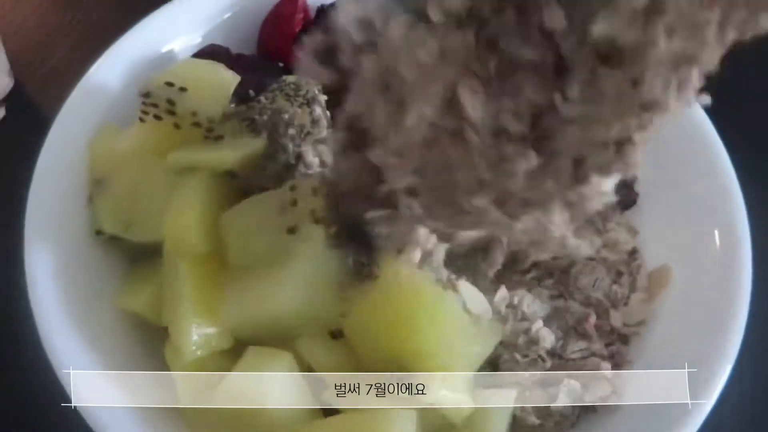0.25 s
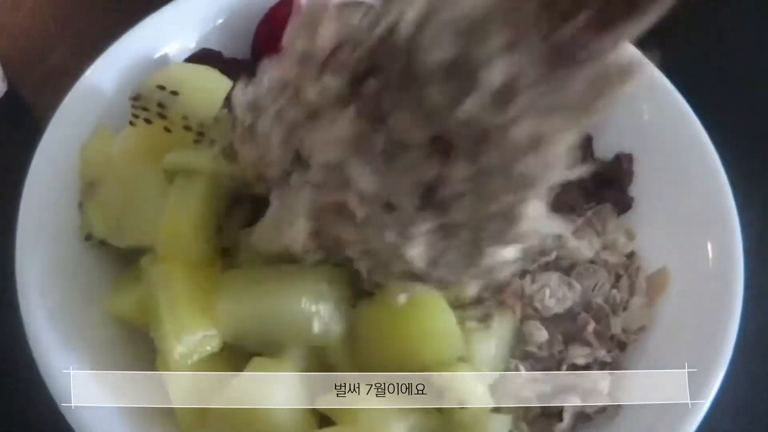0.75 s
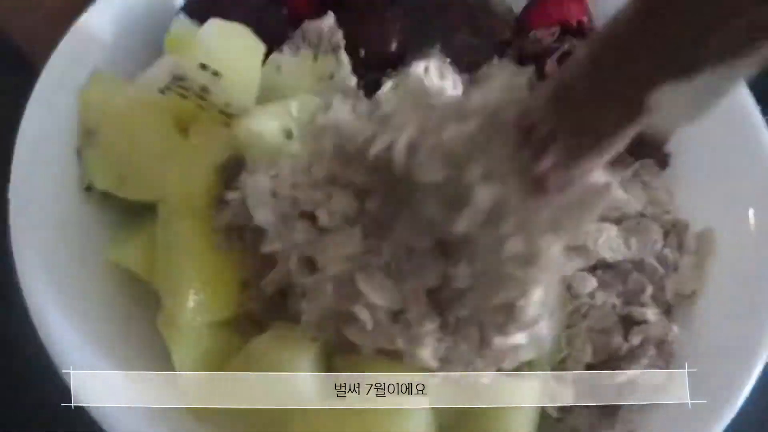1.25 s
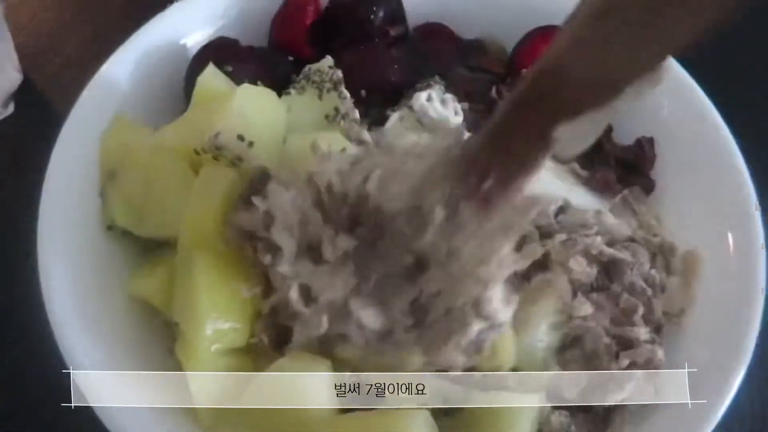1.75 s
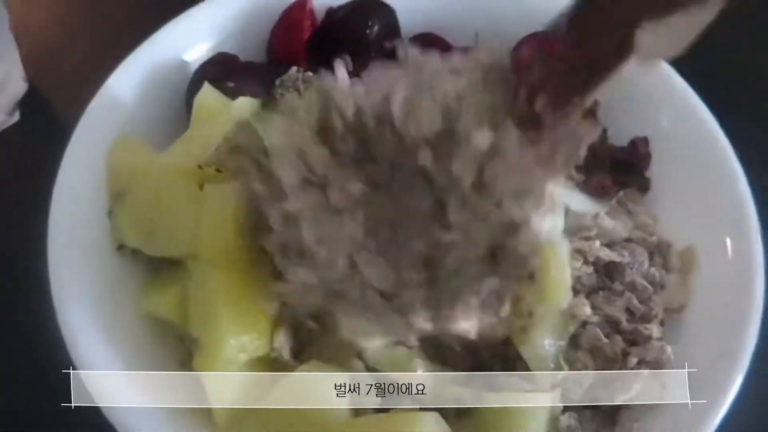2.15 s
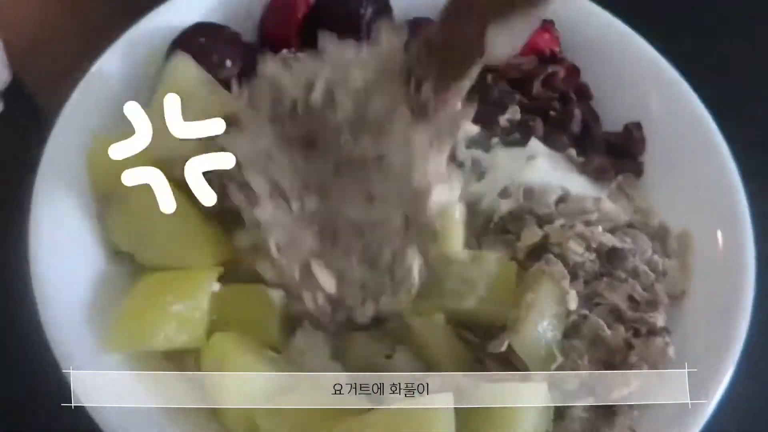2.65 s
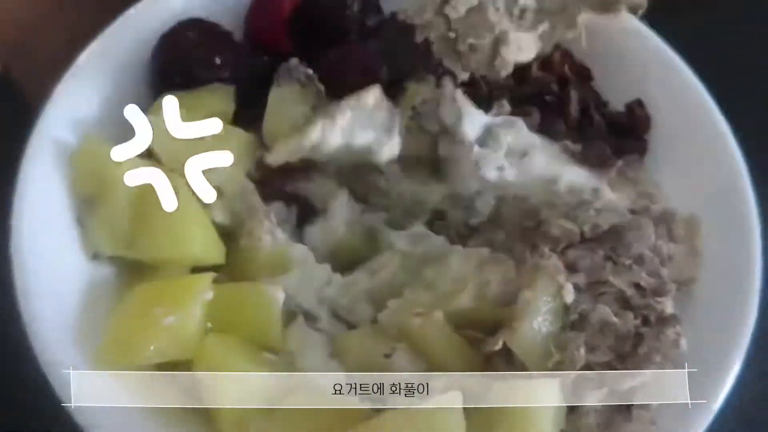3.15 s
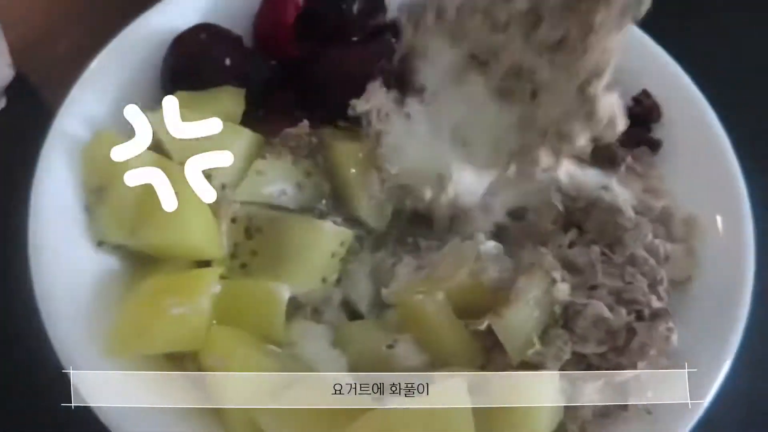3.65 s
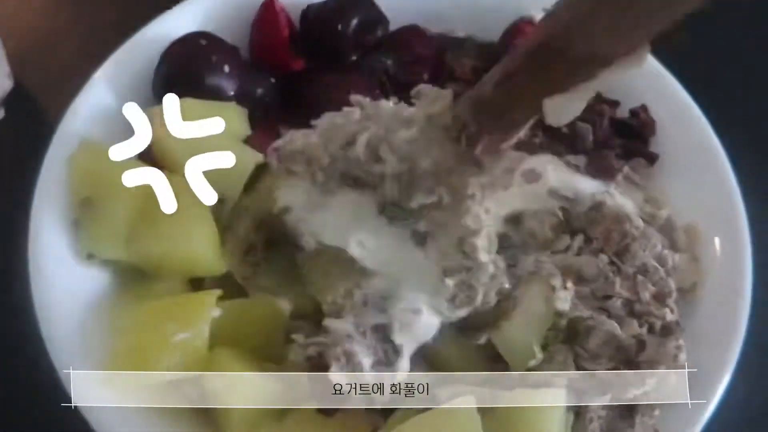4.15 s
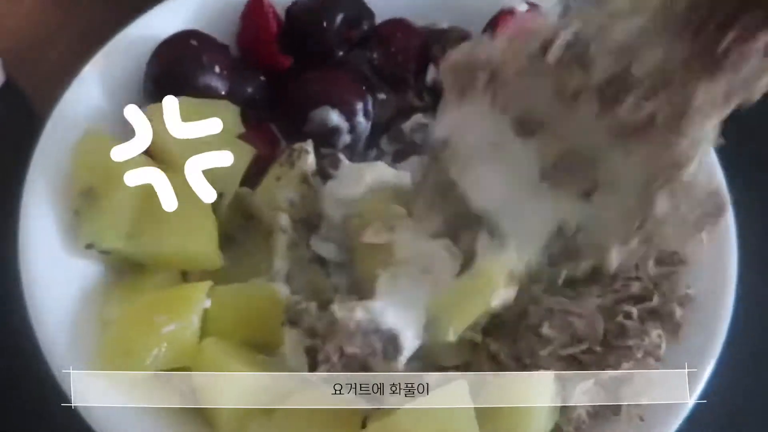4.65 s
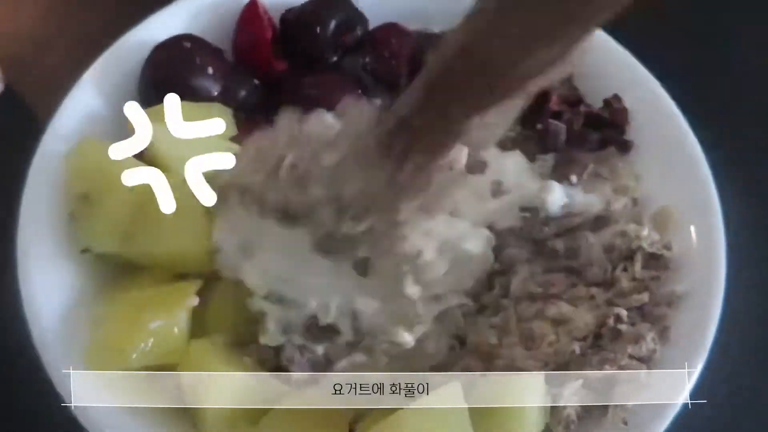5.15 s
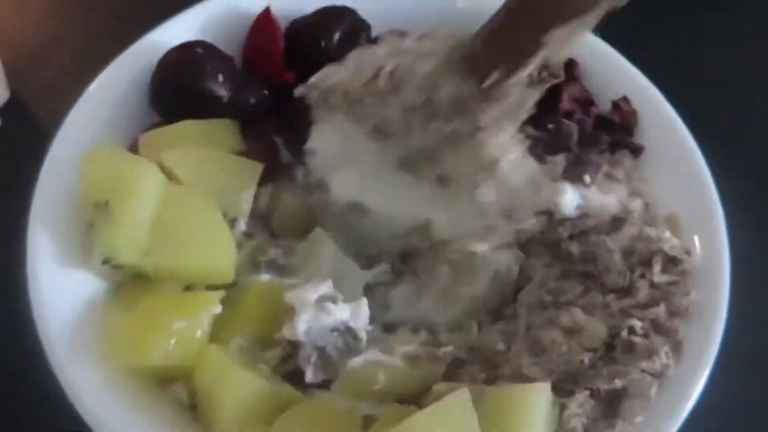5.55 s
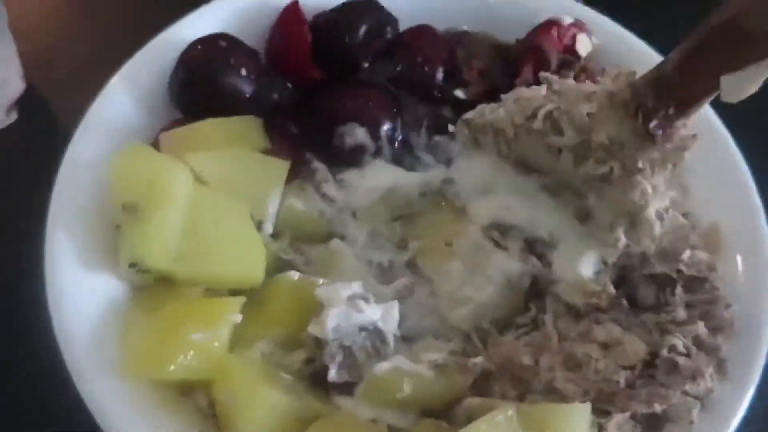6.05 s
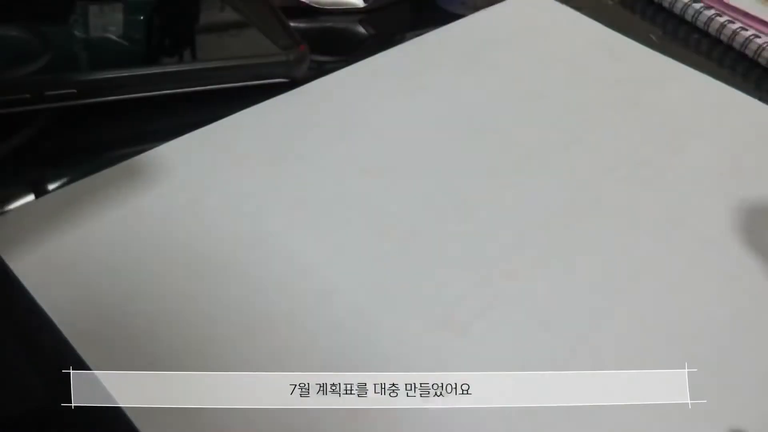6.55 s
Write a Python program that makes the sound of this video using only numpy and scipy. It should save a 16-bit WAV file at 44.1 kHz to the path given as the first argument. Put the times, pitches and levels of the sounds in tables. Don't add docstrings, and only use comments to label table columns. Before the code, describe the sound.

Gritty wood scraping with hard knocks cuts to rapid crunching chops and sharp ceramic ticks over fridge hum, then a quiet desk with faint ticks.

```python
import sys
import numpy as np
from scipy import signal
from scipy.fft import rfft, irfft, next_fast_len
from scipy.io import wavfile
from scipy.ndimage import uniform_filter1d

SR = 44100
rng = np.random.default_rng(int(sys.argv[2]) if len(sys.argv) > 2 else 0)


def transcribe(signal):
    frames = np.atleast_2d(signal).T
    limited = np.clip(frames, -1, 1)
    pcm = np.round(limited * 32767).astype(np.int16)
    wavfile.write(sys.argv[1], SR, pcm)


def nominal_scale(level):
    x = np.asarray(level, float) / 20
    return 10 ** x


N = 300313
T = np.arange(N) / SR

# start in seconds, end in seconds, edge in ms.
SHOTS = [
    (-1, 2.437, 4),
    (2.437, 6.284, 3),
    (6.317, 8, 1),
]
# frequency in Hz, level in dB per Hz.
AIR = [
    [(15, -32.5), (25, -12.5), (59, -2), (145, -3.5), (270, 1), (591, -18), (659, -12), (775, -14),
     (1610, -14.5), (6920, -30), (13600, -39.5), (16000, -46.5)],
    [(20, -49.5), (45, -43), (70, -21.5), (115, -27), (170, -15.5), (300, -18.5), (450, -12.5), (570, -12),
     (640, -7.5), (720, -12), (1200, -16), (1700, -23), (4000, -25), (15000, -36), (16300, -40)],
    [(15, -54), (25, -23), (48, -33), (195, -7.5), (394, -4.5), (591, -5), (1560, -18.5), (2550, -17.5),
     (8360, -25.5), (14800, -36.5), (16000, -47.5)],
]
# frequency in Hz, level in dB, t60 in seconds.
BOWL = [(1057, 15, 0.023), (830, 5, 0.041), (1322, 2, 0.047), (576, 0, 0.056), (425, -1.5, 0.044)]
# frequency in Hz, level in dB, t60 in seconds.
TABLE = [(225, 3.5, 0.04), (278.3, 5.5, 0.052)]


def unit(x):
    return x / np.sqrt(np.mean(x ** 2))


def colour(x, points):
    hz, db = np.transpose(points)
    n = next_fast_len(len(x))
    f = np.maximum(np.fft.rfftfreq(n, 1 / SR), 1)
    gain = nominal_scale(np.interp(np.log(f), np.log(hz), db, left=-80, right=-80))
    return unit(irfft(rfft(x, n) * gain, n)[:len(x)])


def band(x, lo_hz, hi_hz):
    edges_hz = [lo_hz, min(hi_hz, 0.45 * SR)]
    return signal.sosfilt(signal.butter(2, edges_hz, "bandpass", fs=SR, output="sos"), x)


def walk(rate):
    k = int(SR / rate)
    steps = np.repeat(rng.standard_normal(N // k + 1), k)
    return unit(uniform_filter1d(uniform_filter1d(steps, k), k)[:N])


def grains(per_s, spread_db):
    hits = (rng.random(N) < per_s / SR) * rng.standard_normal(N)
    return hits * nominal_scale(spread_db * np.minimum(rng.exponential(size=N), 3))


def ring(modes, detune=1, push_ms=0.71, size=SR // 3):
    t = T[:size]
    y = sum(nominal_scale(db) * np.sin(2 * np.pi * hz * detune * t) * 1000. ** (-t / t60) for hz, db, t60 in modes)
    y = y * np.sin(np.pi / 2 * np.minimum(t * 1000 / push_ms, 1)) ** 2
    return y / np.abs(y).max()


def ground(modes, shorter, per_s, spread_db):
    pressed = ring([(hz, db, shorter * t60) for hz, db, t60 in modes])
    return unit(signal.fftconvolve(grains(per_s, spread_db), pressed)[:N])


def add(track, s, sound):
    i = int(s * SR)
    track[i:i + len(sound)] += sound[:N - i]


def swells(rows, square=1.7):
    out = np.zeros(N)
    for s, db, rise_ms, fall_ms in rows:
        near = slice(max(int((s - rise_ms / 250) * SR), 0), int((s + fall_ms / 125) * SR))
        t = T[near] - s
        late = np.abs(t) * 1000 / np.where(t < 0, rise_ms, fall_ms)
        out[near] += nominal_scale(db - 12.25 * late ** np.where(t < 0, square, 1.15))
    return out


def patchy(x, lo_hz, spread_db, rate):
    edges = lo_hz * 2 ** np.arange(0, np.log2(16000 / lo_hz), 0.5)
    return unit(sum(nominal_scale(spread_db * walk(rate)) * band(x, hz, 1.375 * hz) for hz in edges))


def shot(k):
    start, end, edge_ms = SHOTS[k]
    return np.clip(np.minimum(T - start, end - T) * 1000 / edge_ms + 0.5, 0, 1)


def crunch():
    # time in seconds, rms level in dB, length in ms, depth in dB.
    chop_rows = [(2.519, -46, 34, -1), (2.629, -48.5, 30, 0), (2.755, -43, 26, -5), (2.881, -47, 56, -1.5),
                 (3.008, -44.5, 34, -16), (3.2, -51, 28, 6), (3.294, -45.5, 26, -3), (3.442, -40, 47, -6),
                 (3.569, -44, 41, -7), (3.668, -42.5, 36, -2.5), (3.781, -50.5, 41, 2),
                 (3.89, -42, 19, -17), (4.001, -48, 20, -6), (4.095, -46.5, 27, 4), (4.205, -49.5, 43, 1.5),
                 (4.313, -40.5, 43, 0), (4.422, -39.5, 26, -7), (4.539, -41, 32, -2.5),
                 (4.645, -44, 29, -10), (4.771, -43, 30, 0.5), (4.884, -39.5, 25, -6),
                 (5.007, -42.5, 25, -4), (5.121, -44, 18, -3), (5.256, -47, 33, -10),
                 (5.486, -48.5, 33, 1.5), (5.59, -45, 28, 3.5), (5.609, -53.5, 38, 1), (5.692, -49, 19, 1),
                 (5.757, -48.5, 67, 6.5), (5.871, -48, 38, 6.5), (5.977, -41, 31, -4.5)]
    # time in seconds, rms level in dB, fall in ms.
    burst_rows = [(2.892, -33.5, 12), (3.331, -43, 7.6), (3.352, -41, 9.2), (3.452, -26.5, 7.5),
                  (3.899, -30.5, 12), (4.43, -32.5, 11), (4.656, -29.5, 11)]
    # frequency in Hz, level in dB per Hz.
    crunch_colour = [(1300, -31), (2100, -5), (2800, -5), (3400, -2), (4600, -1), (5600, -2.5),
                     (6900, -4.5), (8200, -7.5), (11000, -14)]
    rise = 0.46
    suddenness = 3.4
    shapes = [(s, db, rise * ms, (1 - rise) * ms, depth_db) for s, db, ms, depth_db in chop_rows]
    chops = swells([(s, db, up, down) for s, db, up, down, _ in shapes], suddenness)
    digs = swells([(s, db + depth_db, up, down) for s, db, up, down, depth_db in shapes], suddenness)
    bursts = swells([(s, db, 4.6, ms) for s, db, ms in burst_rows])

    body = chops + bursts
    top = nominal_scale(-7) * chops + nominal_scale(-9.5) * bursts
    deep = digs + nominal_scale(-3) * bursts
    flakes = colour(grains(per_s=4500, spread_db=2.6), crunch_colour)
    flakes = patchy(flakes, 1417, 2.1, 60)
    crumbs = unit(band(grains(per_s=9000, spread_db=2.2), 9500, 16300))
    grind = ground(BOWL + TABLE, 0.5, per_s=2000, spread_db=3.0)
    return nominal_scale(2 * walk(200)) * body * flakes + nominal_scale(2 * walk(200)) * top * crumbs + deep * grind


def thuds():
    # time in seconds, peak in dB, weight on the table in dB,
    # extra hollow ring in dB.
    thud_rows = [(2.523, -34, -12, 0), (2.767, -35.5, -2.5, -1), (2.858, -44, 10, 0),
                 (2.8933, -18, -19, -3.5), (2.995, -36, 1, 3), (3.013, -39, -25, 0), (3.194, -40, 2, 2),
                 (3.349, -32, -7, 6), (3.434, -34.5, -19, 0), (3.4516, -23, -11, 6), (3.457, -24.5, -18, 4),
                 (3.569, -41, 2, 2), (3.779, -46, 6.5, 2), (3.884, -45.5, 12.5, 0),
                 (3.897, -15, -17.5, -1.5), (4.004, -29.5, -1, 8), (4.092, -46, 0, 3), (4.205, -43, 3, 3),
                 (4.292, -35, -22, 7), (4.312, -32.5, -13, 0), (4.407, -35.5, -18, -4),
                 (4.43, -22.5, -19.5, 1), (4.525, -40, -20, 4), (4.542, -23, -22, -4), (4.64, -35, -14, 2),
                 (4.654, -24.5, -18, -1), (4.7651, -28.5, -9, 2), (4.771, -25.5, -8.5, 5),
                 (4.782, -33.5, -12, 0), (4.878, -36.5, -1, 2), (4.999, -37, -7, -3), (5.128, -36, -8, 10),
                 (5.134, -36.5, -18, 6), (5.256, -29, -12, 7), (5.263, -31.5, -10, 5), (5.487, -44, -10, 0),
                 (5.577, -34, -6, 4), (5.599, -44, -8, 7), (5.744, -38, 2.5, 7), (5.7626, -27.5, -3.5, -6),
                 (5.854, -44, -17, 3), (5.879, -41, -3, -3), (5.971, -33, -15, -3), (5.978, -34, -16, -6)]
    out = np.zeros(N)
    for (s, db, weight_db, hollow_db), luck in zip(thud_rows, rng.standard_normal((len(thud_rows), 11))):
        struck = []
        for k, (hz, mode_db, t60) in enumerate(BOWL):
            level_db = mode_db + 1.5 * luck[k] + hollow_db * (k == 1)
            struck.append((hz * (1 + luck[k + 5] / 70), level_db, t60))
        add(out, s, nominal_scale(db) * ring(struck, push_ms=0.97, size=SR // 10))
        table_blow = ring(TABLE, 1 + luck[10] / 40, push_ms=1.93, size=SR // 10)
        add(out, s, nominal_scale(db + weight_db) * table_blow)
    return out


def ticks():
    # time in seconds, peak in dB, pitch in Hz, edge in dB.
    strikes = [(2.732, -20, 5680, -28.5), (2.8931, -3.5, 4330, -32.5), (3.3284, -11, 6300, -5.5),
               (3.3513, -24, 3000, 2), (3.3551, -13, 4730, 0), (3.364, -36, 6000, 3),
               (3.4514, -15, 3910, -12), (3.8971, -1.5, 6800, -14.5), (3.8972, -4, 3400, -39),
               (4.2959, -31, 5300, -8), (4.3117, -24, 5330, -7), (4.408, -37, 3600, -17.5),
               (4.4297, -12.5, 3840, -36), (4.5237, -22, 6000, -14), (4.5294, -16.5, 7000, -24),
               (4.5431, -20.5, 3860, -15), (4.5785, -24, 4850, -23), (4.6551, -13, 7100, -21.5),
               (4.6826, -22, 6500, -7), (4.6858, -23, 4170, -28.5), (5.0093, -22, 8200, 18),
               (5.2635, -28, 6800, -11), (5.5773, -19, 6400, -0.5), (5.581, -26, 8400, 15),
               (5.6908, -16.5, 5800, -4), (5.7629, -21.5, 3280, -19), (5.8791, -26, 5240, 0),
               (5.9774, -17, 5800, 4)]
    # time in seconds, peak in dB, pitch in Hz.
    snaps = [(2.4407, -33, 9600), (2.5727, -24, 7350), (2.6162, -32, 9300), (2.7515, -25, 4700),
             (2.8565, -29, 10400), (2.942, -37, 4900), (3.1965, -27, 4460), (3.2026, -30, 5600),
             (3.265, -26, 5000), (3.3222, -32, 5000), (3.2903, -25, 7100), (3.3255, -28, 5900),
             (3.3331, -32, 6700), (3.4183, -35, 8500), (3.4551, -30, 5400), (3.4948, -35, 5900),
             (3.5738, -27, 6800), (3.6701, -30, 4770), (3.8804, -36, 8900), (4.0039, -33, 3840),
             (4.0857, -31, 4280), (4.3708, -25, 6800), (4.6362, -31, 6370), (4.7676, -29, 5700),
             (4.9385, -31.5, 4970), (5.001, -24.5, 5040), (5.0584, -33, 5600), (5.1141, -28, 3550),
             (5.1265, -32, 4700), (5.475, -27.5, 5860), (5.5862, -29, 3900)]
    # time in seconds, peak in dB, pitch in Hz.
    grit = [(0.1476, -38.5, 2400), (0.4718, -44, 3100), (0.6755, -37, 2700), (1.1685, -41, 3900),
            (1.627, -11.5, 1870), (1.6268, -21, 3200), (1.6269, -23, 5500), (1.8815, -43, 2800),
            (1.8923, -34, 2350), (2.1, -41.5, 2010), (2.198, -42, 1500), (2.3036, -33, 5500),
            (2.304, -22, 1250), (2.206, -34, 4500), (2.209, -37.5, 4500), (2.25, -29, 1700),
            (2.2506, -28, 4400), (2.2683, -28, 2690), (2.3, -37, 2300), (2.3033, -19.5, 2250),
            (2.42, -33.5, 4460), (6.5209, -52, 5660), (6.6994, -54, 5870), (6.7204, -50, 5430),
            (6.7431, -54, 5300), (6.7637, -52, 2180)]
    # time in seconds, peak in dB, pitch in Hz.
    more_snaps = [(2.7494, -37, 3700), (2.7534, -31, 4800), (2.8715, -33, 6500), (2.8803, -33, 5000),
                  (2.8898, -20, 3360), (2.8912, -21, 6970), (3.2918, -22, 6900), (3.296, -30, 7500),
                  (3.299, -30, 5950), (3.3269, -30, 10500), (3.4478, -30, 5600), (3.4531, -24, 3550),
                  (3.4569, -28, 3400), (3.486, -38, 5200), (3.5679, -33, 5400), (3.6644, -27, 4480),
                  (3.6717, -33, 4650), (3.8852, -35, 6000), (3.8888, -31, 5900), (3.9086, -32, 6800),
                  (4.3065, -36, 5400), (4.4311, -18.5, 3300), (4.5338, -31, 5250), (4.6523, -23, 3080),
                  (4.6535, -24, 4050), (4.6575, -23, 7300), (4.678, -29, 5900), (4.7664, -36, 7000),
                  (4.7722, -31, 3880), (4.8779, -33, 4560), (4.8852, -23, 7750), (4.8868, -34, 4700),
                  (5.067, -40, 11000), (5.1122, -38, 3600), (5.1235, -30, 4200), (5.2555, -26, 6800),
                  (5.5795, -27.5, 2570), (5.5896, -38, 5200), (5.689, -39, 5700), (5.7265, -35, 3280),
                  (5.746, -31, 9500), (5.9721, -29, 4300)]
    glaze_hz = [3400, 4700, 6800, 9300]
    # time in seconds, level in dB, then its ringing as rows of
    # frequency in Hz, level in dB, t60 in seconds.
    tap = (6.7625, -38, [(800, 10, 0.02), (1070, 8, 0.01), (1720, -7, 0.0077), (3200, -10, 0.0053)])
    rows = list(strikes)
    for s, db, hz in snaps + grit + more_snaps:
        rows.append((s, db, hz, min(-17 + 15 * np.log2(hz / 5000), 0)))

    mid, side = np.zeros((2, N))
    t = T[:400]
    for (s, db, hz, edge_db), noise in zip(rows, rng.standard_normal((len(rows), 400))):
        in_bowl = SHOTS[1][0] < s < SHOTS[1][1]
        rings_hz = glaze_hz if in_bowl else [0.91 * hz]
        modes = [(g, 1.5 * u - 7 - 14 * np.log2(g / hz) ** 2, 0.0026) for g, u in zip(rings_hz, noise)]
        modes.append((hz, 5, (4.6 if in_bowl else 9) / hz))
        modes.append((14500, edge_db + 6.0, 0.001))
        click = band(ring(modes, push_ms=700 / hz, size=400), 0.7 * hz, 17000)
        rustle = nominal_scale(-14.5) * unit(band(noise, 0.63 * hz, 1.76 * hz)) * np.exp(-t / 0.00067)
        add(mid, s, -nominal_scale(db + 2.5) * (click + rustle))
        add(side, s, nominal_scale(min(db, -16) - 11) * np.tanh(noise[-1]) * np.gradient(click))
    tap_s, tap_db, tap_modes = tap
    add(mid, tap_s, nominal_scale(tap_db) * band(ring(tap_modes, push_ms=0.25), 296, 12000))
    return mid, side


def board():
    # time in seconds, level in dB, rise in ms, fall in ms.
    stroke_rows = [(0.0, -51, 30, 110), (.17, -64, 160, 47), (.365, -41, 55, 76), (.51, -61, 31, 65),
                   (.8, -42, 68, 57), (1.225, -43, 56, 60), (1.6, -40.5, 48, 26), (1.94, -45.5, 41, 31),
                   (2.01, -66, 18, 30), (2.06, -66, 74, 58), (2.285, -46, 56, 48)]
    # frequency in Hz, level in dB per Hz.
    scrape_colour = [(350, -42), (600, -8.5), (894, -26), (970, -5.5), (1510, 3.5), (1660, 1.5),
                     (2310, 3.5), (3080, -3), (5630, -6), (16000, -31.5)]
    # time in seconds, body in dB, snap in dB, snap pitch in Hz, rattle in dB.
    knocks = [
        (1.6268, -12, -3.5, 1576, -35.5),
        (1.6405, -17.5, -14.5, 1480, -57.5),
        (1.9635, -20.5, -55, 800, -62),
        (1.9753, -22.5, -56, 800, -74.5),
        (2.3037, -11.5, -20, 2290, -46.5),
        (2.3155, -20.5, -44, 1450, -69),
    ]
    # frequency in Hz, level in dB, t60 in seconds.
    board_modes = [(278, -1, 0.1), (350, 13.5, 0.095), (385, -14, 0.087), (462, 4, 0.08), (686, -12, 0.04),
                   (964, -11, 0.04), (1150, -14, .04), (99.6, -6, 0.17)]
    scrape = patchy(colour(grains(per_s=5000, spread_db=2.2), scrape_colour), 500, 2.5, 25)
    rumble = ground(board_modes, 0.48, per_s=900, spread_db=3.5)
    rattle = unit(band(band(grains(per_s=6500, spread_db=-2.0), 745, 1920), 754, 2960))
    strokes = swells(stroke_rows)
    contact = nominal_scale(-66) + strokes
    shake = nominal_scale(-65.5) + nominal_scale(-4) * strokes

    out = np.zeros(N)
    for k, (s, body_db, snap_db, snap_hz, rattle_db) in enumerate(knocks):
        since_first = T[:SR // 3] + s - knocks[k - k % 2][0]
        settled = np.clip((since_first - 0.0185) / 0.0034, 0, 1)
        add(out, s + 0.00074, nominal_scale(body_db - 17 * settled) * ring(board_modes, push_ms=1.41))
        add(out, s, -nominal_scale(snap_db) * ring([(snap_hz, 0, 0.0075)], push_ms=0.98))
        add(shake, s, nominal_scale(body_db - 25 - 60 * T[:SR] / 0.54))
        out += (T > s) * nominal_scale(rattle_db - 60 * np.abs(T - s) / 0.5) * rattle
    unsteady_hand = nominal_scale(2.06 * walk(59.8))
    return out + unsteady_hand * (contact * scrape + shake * rumble)


def bumps():
    # time in seconds, level in dB, frequency in Hz, t60 in seconds.
    bump_rows = [(.003, -38.5, 87, 0.041), (0.35, -36, 179, 0.1), (.395, -39, 90, 0.097),
                 (1.118, -28.5, 56, 0.11), (3.3494, -31.5, 230, 0.016), (3.354, -49, 110, .07),
                 (1.63, -19, 1000, .04), (1.654, -29, 1400, .03), (1.661, -30, 1700, .03),
                 (1.648, -24, 1600, .025), (3.456, -29.5, 425, .07), (5.764, -28.5, 549, 0.043),
                 (5.258, -39.5, 225, 0.067)]
    out = np.zeros(N)
    for s, db, hz, t60 in bump_rows:
        add(out, s, -nominal_scale(db) * ring([(hz, 0, t60)], push_ms=min(800 / hz, 150 * t60)))
    return band(out, 35, 3300)


def kitchen(x):
    # frequency in Hz, t60 in seconds, level in dB.
    echo = [
        (358, 0.35, -6),
        (1190, 0.12, -13.5),
        (3450, 0.56, -16),
        (8000, 0.23, -14),
    ]
    t = T[:SR // 2]
    tail = 0
    for hz, t60, db in echo:
        part = band(rng.standard_normal(len(t)), 0.63 * hz, 2.1 * hz)
        part = part * 1000. ** (-t / t60) * np.clip((t - 0.003) / 0.0069, 0, 1)
        flat = band(np.eye(1, len(t))[0], 0.99 * hz, 1.1 * hz)
        tail = tail + nominal_scale(db) * part * np.sqrt(np.sum(flat ** 2) / np.sum(part ** 2))
    return signal.fftconvolve(x, tail)[:N]


def scatter(x):
    # frequency in Hz, t60 in seconds, level in dB.
    tiles = [(1500, 0.16, -15.5), (2200, 0.2, -19), (3500, .33, -14.5), (6000, .22, -12.5),
             (9000, .13, -14), (12000, .11, -16)]
    hz, t60, db = np.transpose(tiles)
    out = 0
    noise = grains(per_s=5000, spread_db=2.5)
    onset = np.exp(-1 / SR / 0.0022)
    for f in 1300 * 2 ** np.arange(0, 3.6, 0.5):
        keep = 1e6 ** (-1 / SR / np.interp(np.log(f), np.log(hz), t60))
        power = band(x, f, np.sqrt(2) * f) ** 2
        smoothing = np.convolve([1, -keep], [1, -onset])
        energy = signal.lfilter([(1 - keep) * (1 - onset)], smoothing, power)
        level = nominal_scale(np.interp(np.log(f), np.log(hz), db))
        out = out + level * np.sqrt(np.abs(energy)) * unit(band(noise, f / 1.2, 1.7 * f))
    return out


def air():
    # frequency in Hz, level in dB per Hz.
    air_side = [
        [(40, -29), (117, -7), (325, -2.5), (560, -10), (2700, -28), (3600, -34.5)],
        [(40, -24), (125, -28.5), (400, -3), (1000, -2), (2700, -14.5), (3500, -19), (4200, -47)],
        [(40, -25), (900, -2.5), (2800, -13), (4500, -24.5), (6000, -39.5)],
    ]
    # mid in dB, side in dB.
    air_db = [
        (-51, -58),
        (-50.5, -58.5),
        (-67, -79.5),
    ]
    # shot number, frequency in Hz, rms level in dB, waver in dB.
    hum = [
        (0, 48.8, -60.5, 0.3),
        (0, 97.8, -63.5, -0.5),
        (1, 148.8, -58.5, 1.6),
        (1, 296.4, -71, 1),
        (1, 599, -60.5, 3),
        (1, 848, -69, 3.5),
        (2, 8220, -89, 2),
    ]
    mid, side = np.zeros((2, N))
    for k, (mid_db, side_db) in enumerate(air_db):
        mid += shot(k) * nominal_scale(mid_db + 0.72 * walk(8.6)) * colour(rng.standard_normal(N), AIR[k])
        side += shot(k) * nominal_scale(side_db) * colour(rng.standard_normal(N), air_side[k])
    for k, hz, db, waver_db in hum:
        phase = 2 * np.pi * np.cumsum(hz * (1 + 0.0029 * walk(6))) / SR
        mid += shot(int(k)) * nominal_scale(db + 3 + waver_db * walk(11)) * np.sin(phase)
    return mid, side


def fading_air():
    end = SHOTS[1][1]
    fade = (T > end) * nominal_scale(-72.0 - 1000 * np.abs(T - end))
    return fade * colour(rng.standard_normal(N), AIR[1])


def scene():
    mid, side = air()
    wood = board()
    clicks, off_centre = ticks()
    bowl = band(band(crunch() + thuds(), 130, 17000), 120, 18000)

    mid += shot(0) * (wood + nominal_scale(8.0) * band(kitchen(wood), 75, 3400))
    mid += bumps() + bowl
    mid += nominal_scale(11.0) * band(kitchen(bowl), 100, 1700)
    mid += scatter(nominal_scale(6.0) * bowl + clicks)
    mid += fading_air()
    side += shot(0) * nominal_scale(-11.5) * kitchen(wood)
    side += nominal_scale(-27.5) * band(kitchen(bowl + clicks), 147, 3000)

    treble_cut = signal.ellip(10, 0.2, 60, 15850, fs=SR, output="sos")
    mid = signal.sosfilt(treble_cut, mid + 0.65 * clicks) + 0.35 * clicks
    return np.array([mid + side + off_centre, mid - side - off_centre])


def low_pass(x):
    return signal.sosfilt(signal.butter(12, 16970, fs=SR, output="sos"), x)


def record(dry):
    top = signal.ellip(12, 0.2, 70, 16550, fs=SR, output="sos")
    mix = 0.94 * signal.sosfilt(top, np.clip(dry, -1, 1))
    return low_pass(mix)


dry = scene()
out = record(dry)
transcribe(out)
```